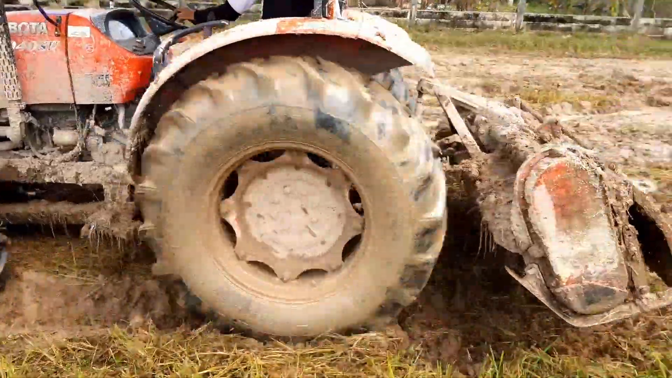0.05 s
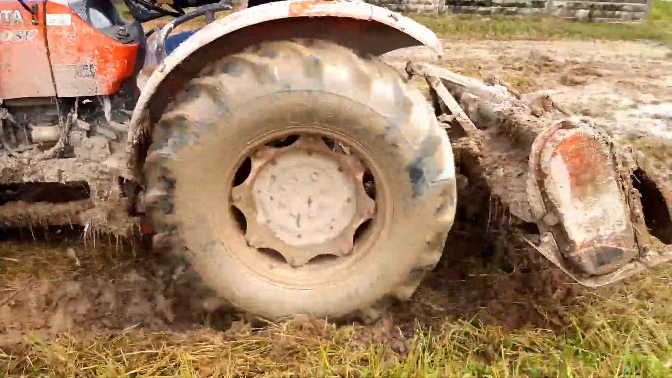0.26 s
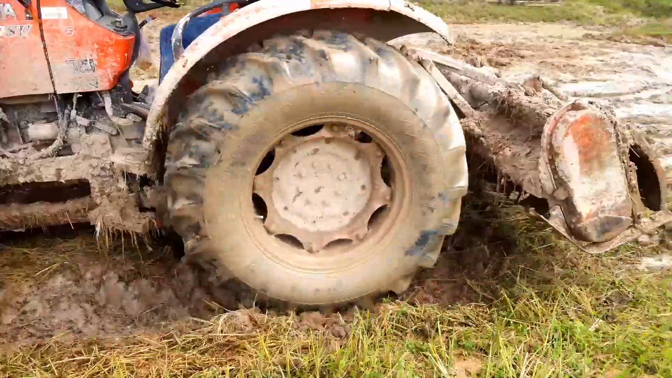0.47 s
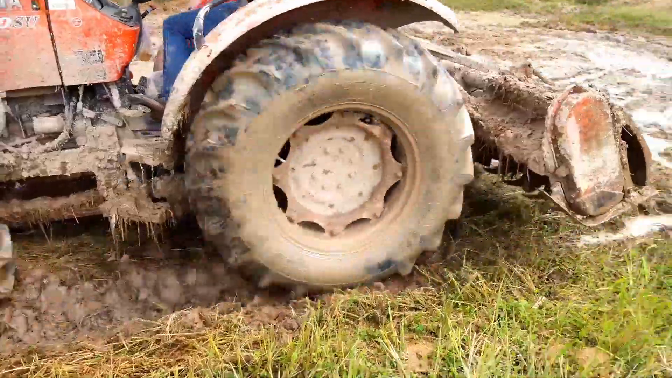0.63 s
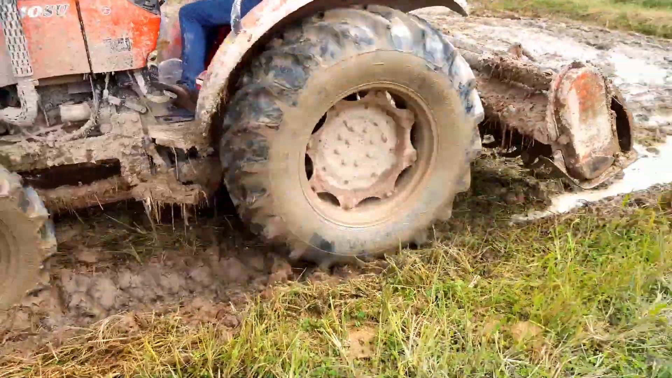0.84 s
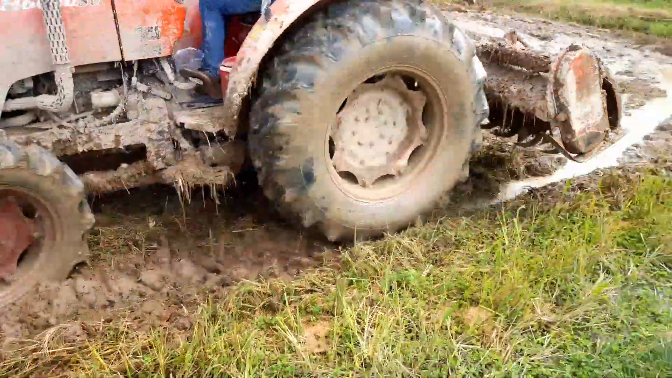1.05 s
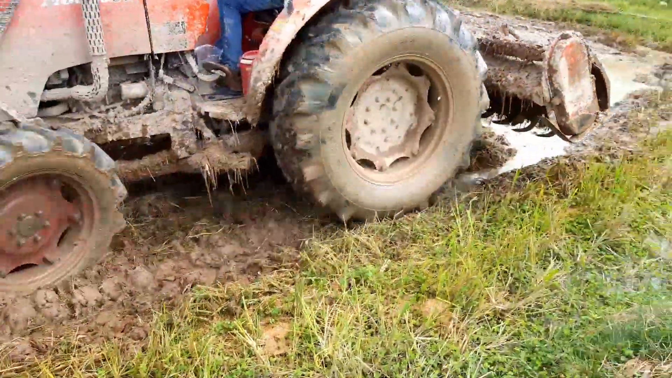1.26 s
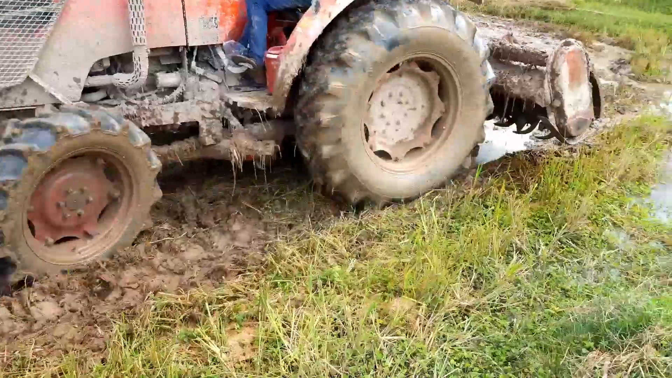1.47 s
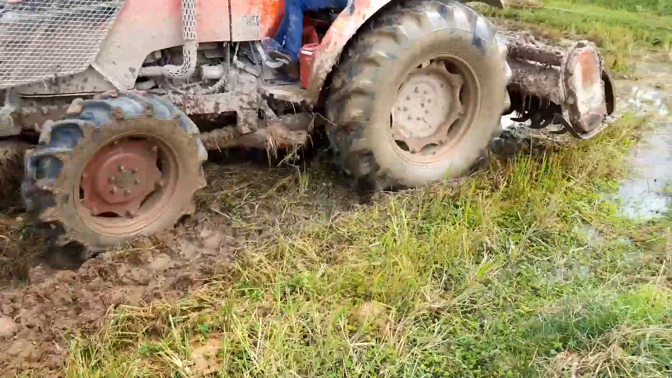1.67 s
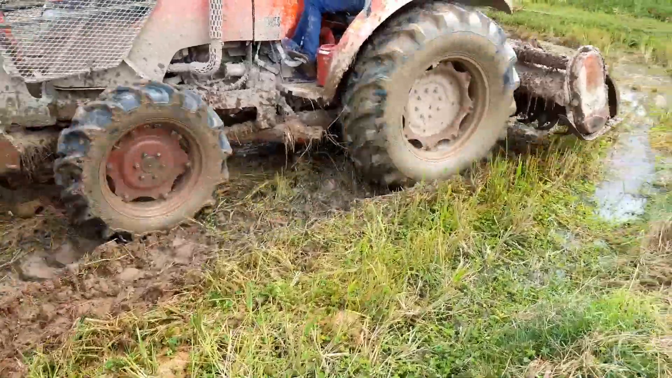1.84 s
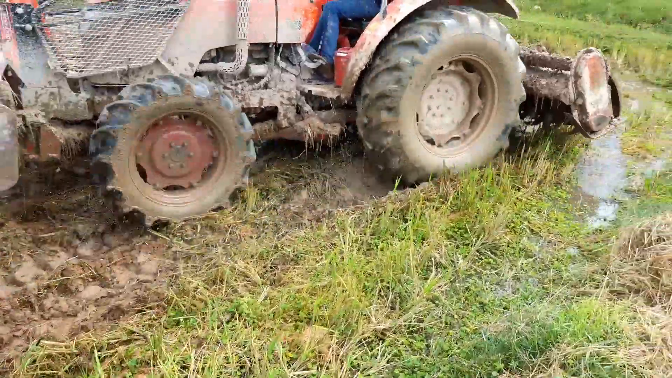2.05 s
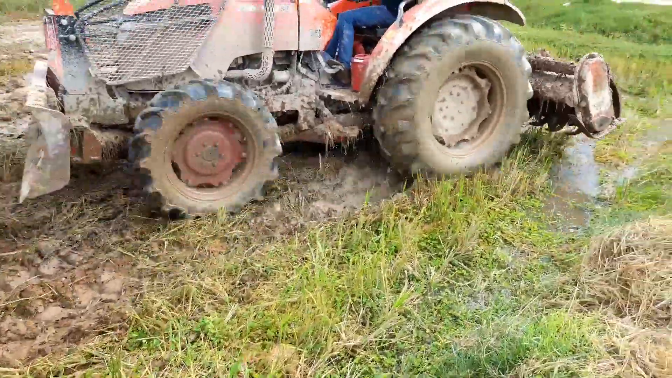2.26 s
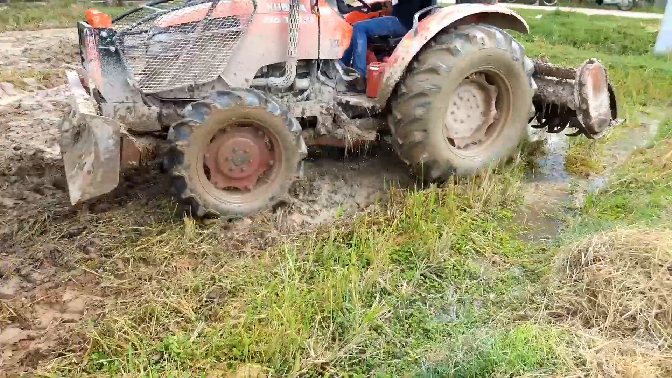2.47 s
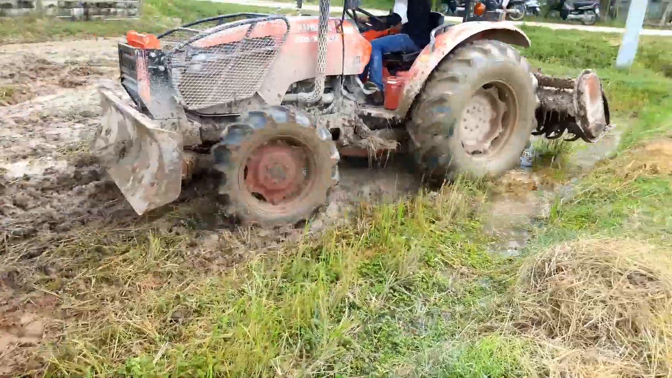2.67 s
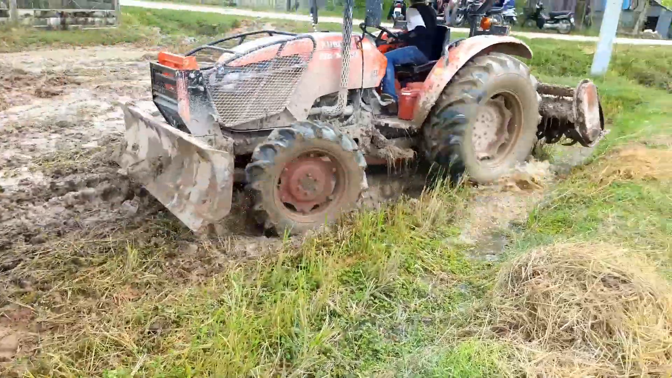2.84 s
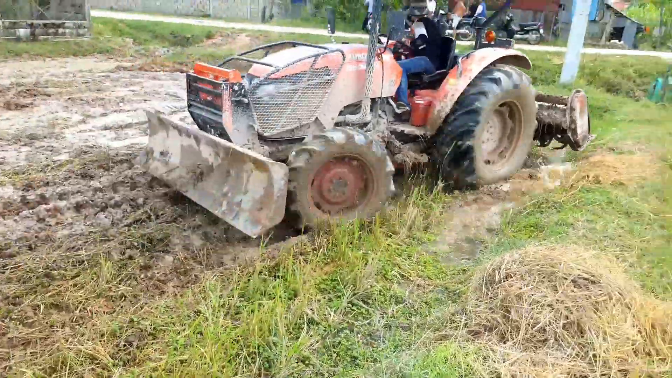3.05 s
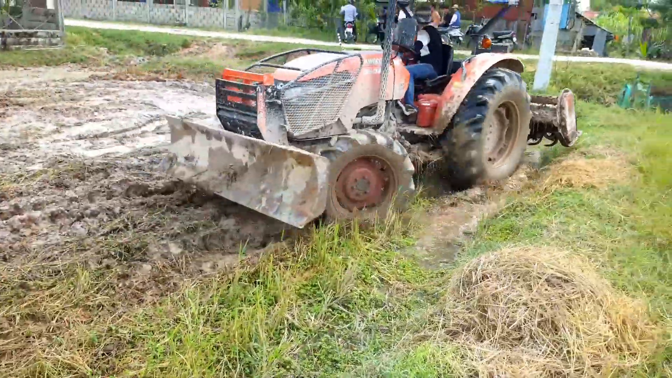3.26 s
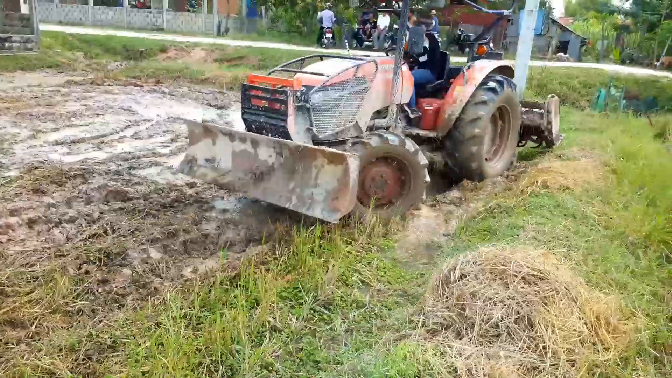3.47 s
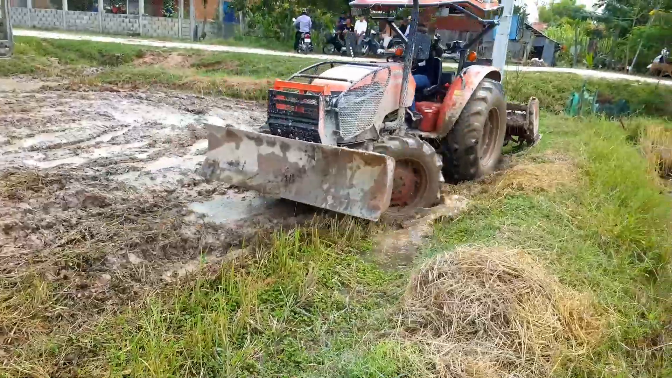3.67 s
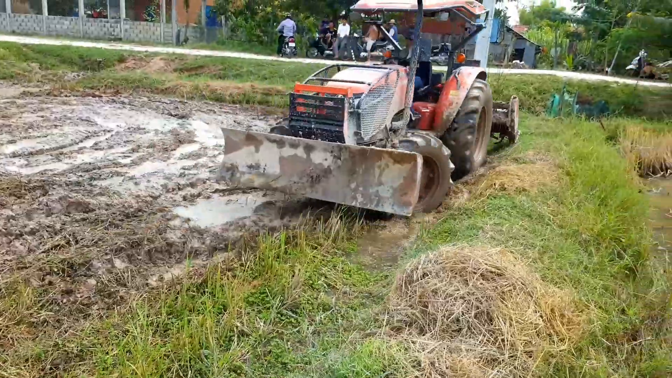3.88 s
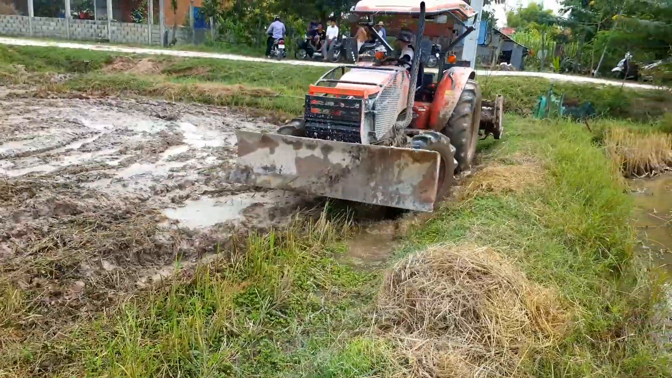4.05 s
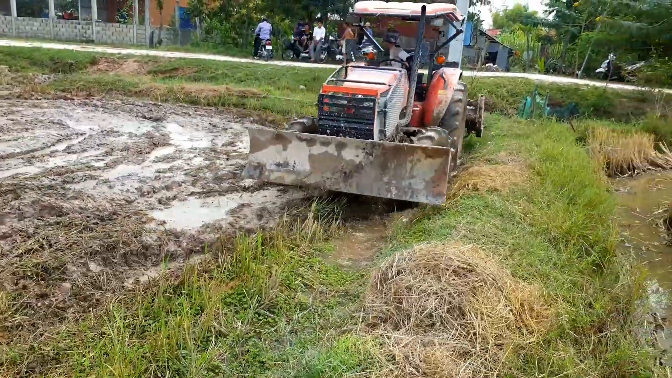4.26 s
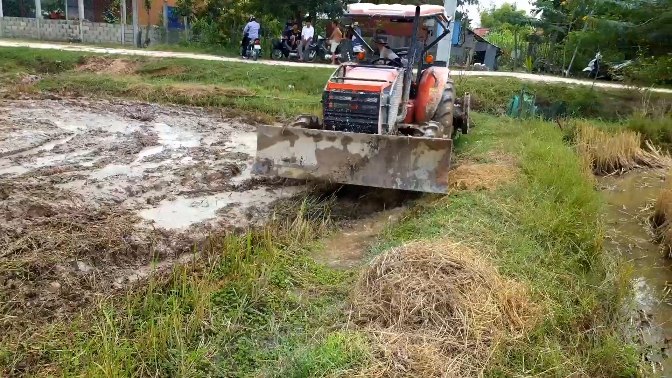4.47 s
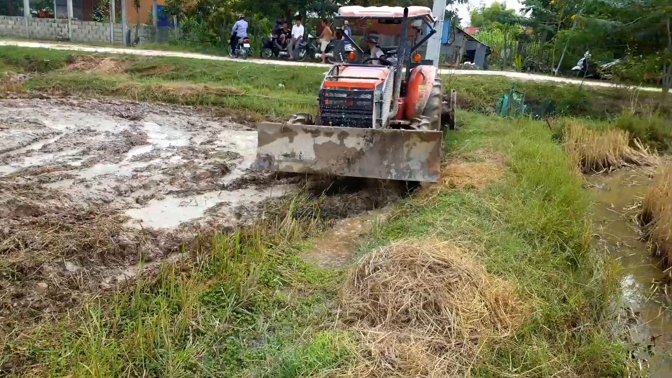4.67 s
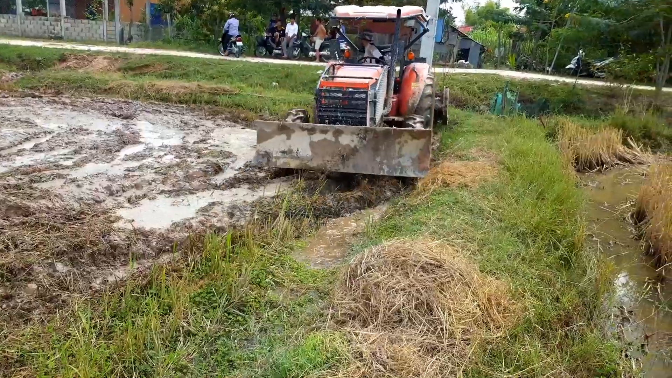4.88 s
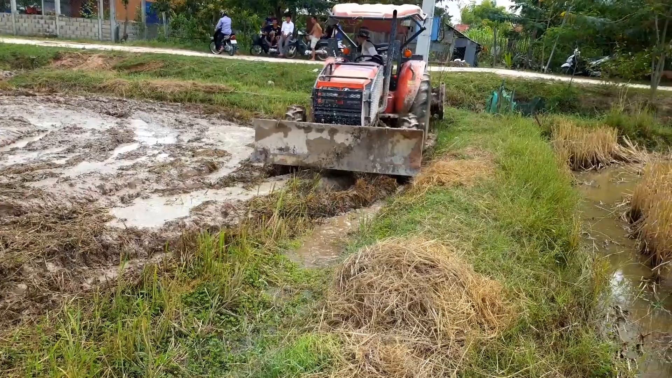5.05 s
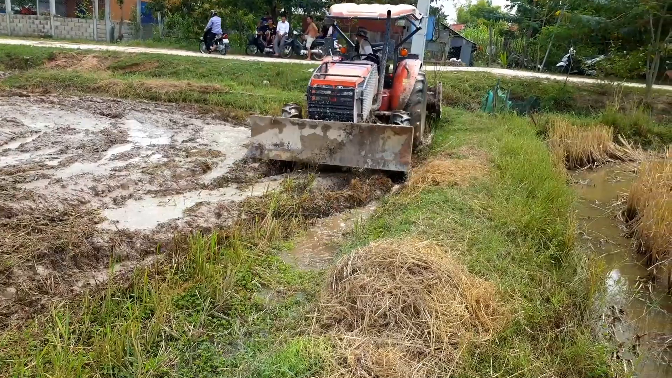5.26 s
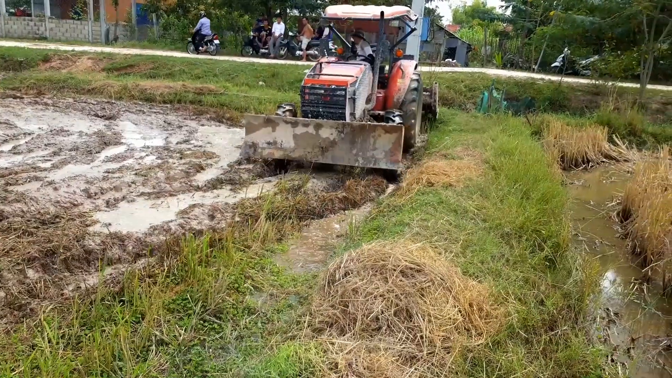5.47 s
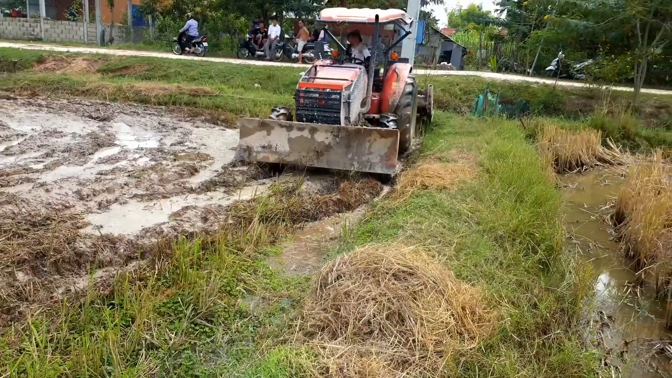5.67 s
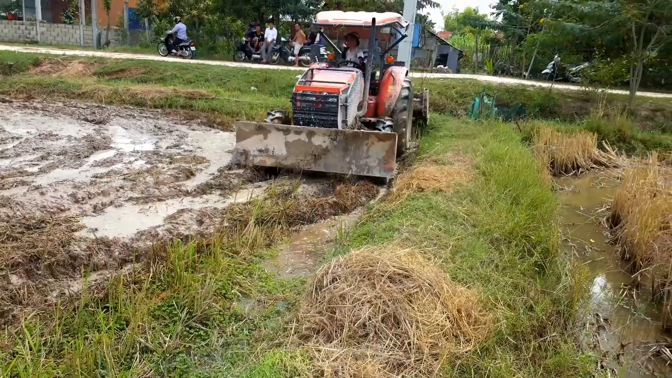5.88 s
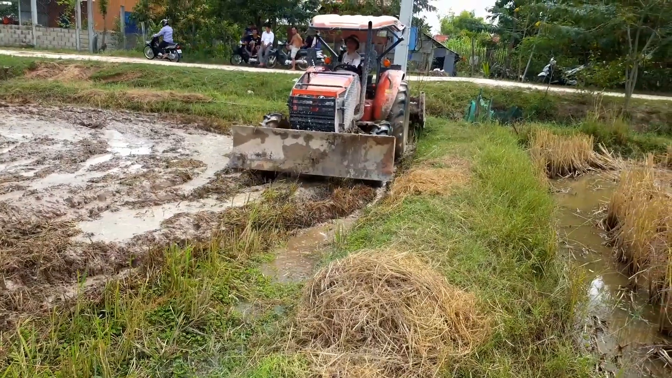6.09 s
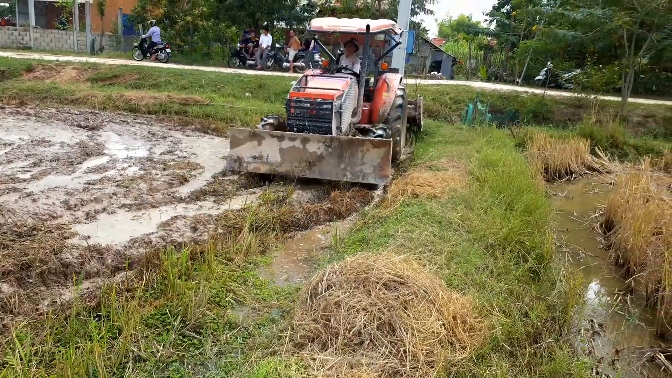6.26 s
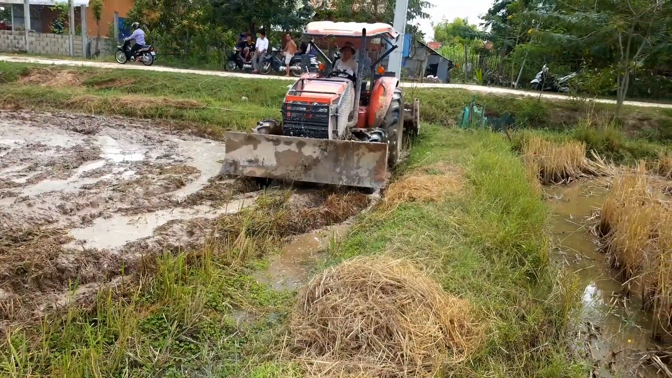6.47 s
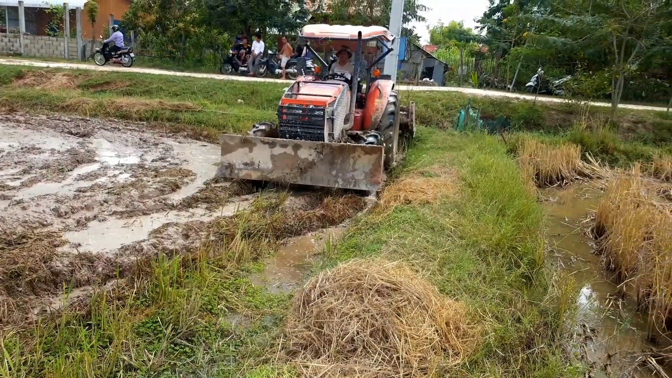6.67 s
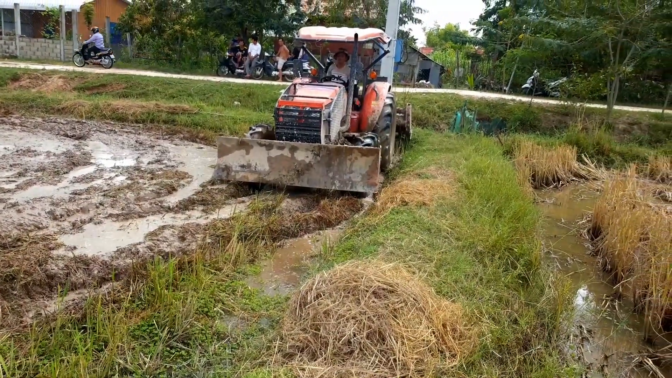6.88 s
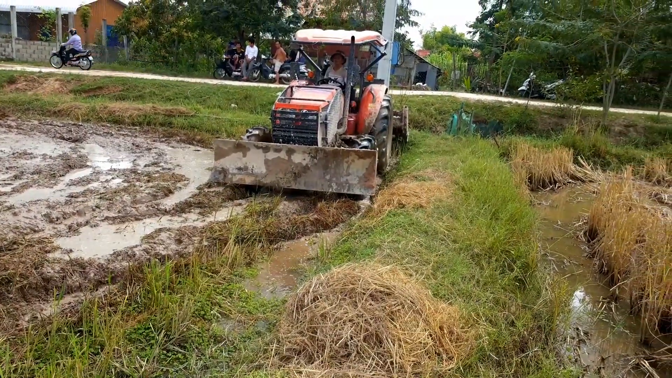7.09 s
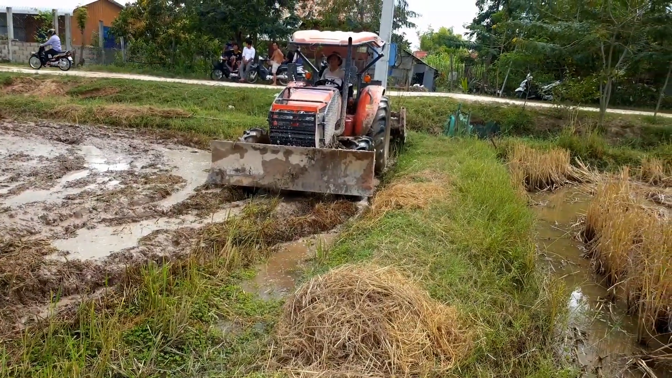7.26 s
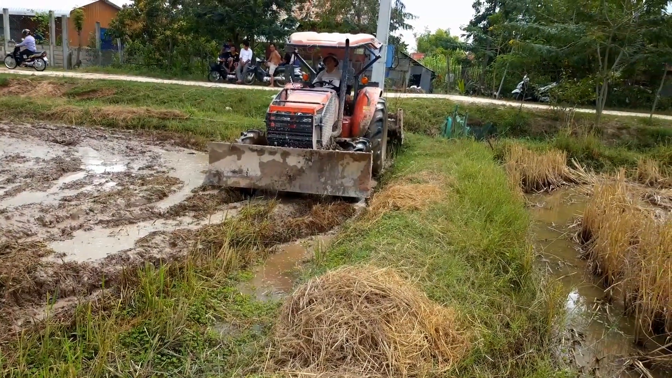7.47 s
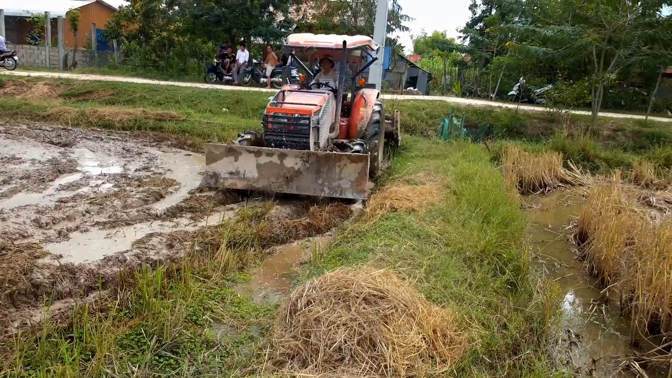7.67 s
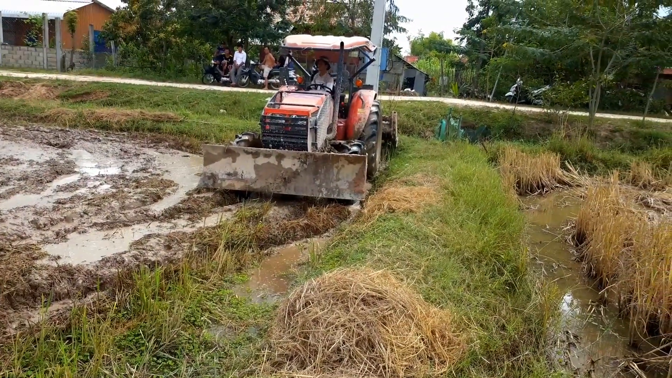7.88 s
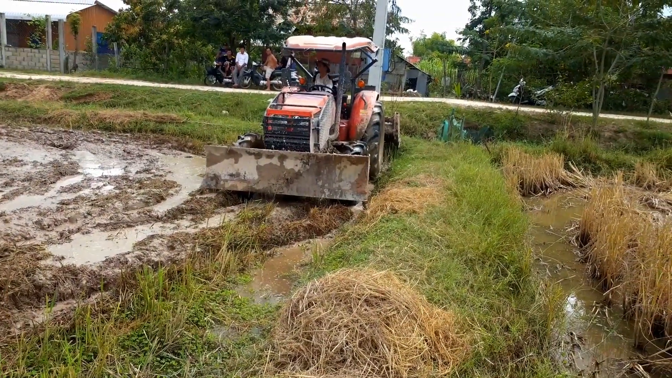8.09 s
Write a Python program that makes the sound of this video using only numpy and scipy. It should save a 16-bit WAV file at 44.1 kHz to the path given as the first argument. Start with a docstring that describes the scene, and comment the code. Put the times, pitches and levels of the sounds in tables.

```python
"""A four-cylinder diesel tractor drives past at full revs through a wet field, then throttles back and pulls up.
It goes from left of the stereo microphone to straight ahead, two to six metres off. The engine sinks almost
to a stall, catches with hard knocks, idles and revs up again. Exhaust, drone, clatter, knock and fan are tones
or pulsed noise that follow the crankshaft; body parts are resonances or coloured noise.
A loose steel part clanks four times, and a faint outdoor hush of noise lies behind it all."""
import sys
import numpy as np
from scipy import signal
from scipy.fft import rfft, irfft, next_fast_len
from scipy.io import wavfile
from scipy.ndimage import uniform_filter1d, map_coordinates

SR = 44100
rng = np.random.default_rng(int(sys.argv[2]) if len(sys.argv) > 2 else 0)


def store_pcm(level_fs):
    """Save levels as 16-bit WAV."""
    pcm = np.round(np.clip(level_fs, -1, 1) * 32767).astype(np.int16)
    wavfile.write(sys.argv[1], SR, np.atleast_2d(pcm).T)


N = 358533

# throttle moves: full revs, ease off, sink towards a stall, catch, idle, rev up:
# (time [s], speed aimed at [firings/s], settling time [s], load [0-1], time for the fuel to follow [s])
THROTTLE_MOVES = [(0, 91.3, .3, .14, .01), (3.11, 61.3, .28, .37, 1.3), (4.87, 3, 1.87, .1, .09),
                  (6.581, 53.8, .458, .33, .11), (6.86, 40.67, .1, .14, .08), (7.724, 70.2, .38, .17, .036)]
# changing drag of the mud at full revs: (time [s], speed gained [firings/s])
MUD_DRAG = [(.45, -.2), (1.15, -1.1), (1.8, 1.2), (2.52, 0), (2.87, 1.1), (3.15, 0)]
GOVERNOR_GAIN = 0.029  # extra fuel for each firing per second that the engine is short of its aim
CATCH_S = 6.725  # a firing falls here, as the engine catches
# path past the microphone: (time [s], distance [m],
# nearness [1 = beside the open engine bay, 0 = facing the bonnet], lag of the right ear [samples])
PATH = [(0, 2.64, 0.8, 9), (1.2, 2.19, 0.83, 10.5), (2.2, 3.04, 0.87, 4), (3, 3.12, 0.82, 0),
        (3.8, 3.8, 0.69, -1.5), (5, 5.74, 0.65, -2), (6, 3.86, 0.4, -4), (8.13, 4.97, 0.4, -0.5)]
MID_SPEED = 60  # firings per second at which the loudness laws start
# loudness laws, before the mix inside each part:
# (level at 1 m and MID_SPEED [dB], rise per doubling of speed [dB], added at full fuel [dB])
BOOM_LAW = (-30.5, 8.26, -2)
CLATTER_LAW = (-32, 12.54, 4)
KNOCK_LAW = (-51, 16.25, 20.9)

# exhaust note: (multiple of the firing rate, level [dB])
EXHAUST_ORDERS = [(1, 1.5), (1.5, -8), (2, -1), (3, -4), (4, -6), (5, -12)]
# resonances of the exhaust pipe: (frequency [Hz], gain [dB])
PIPE_RESPONSE = [(33, -11), (41, -1.5), (62, 0), (82, -3.5), (118, 1.5), (145, -1), (168, 1.5), (215, -11),
                 (300, -33)]
# exhaust note without fuelling: (time [s], level [dB])
EXHAUST_LEVEL = [(0, -43), (1.4, -66), (3.3, -45), (4.4, -42), (5.3, -45.5), (6.3, -48), (6.7, -55),
                 (6.85, -46.5), (7.7, -54), (8.13, -40.5)]
EXHAUST_FUEL_DB = 14  # added at full fuel
# deep throb that drifts against the racing engine: (time [s], rate [beats/s], level [dB])
THROB_COURSE = [(0, 39, -39), (.4, 42.8, -33), (.9, 45, -37), (1.4, 51.4, -37.5), (1.6, 45.3, -36.5),
                (2.08, 49, -32.5), (2.2, 44.3, -31), (2.36, 44, -30), (2.72, 40.3, -31), (2.85, 47.6, -37),
                (3.5, 61.7, -40), (4.3, 68, -74)]

# strong orders of the drone at full revs: (multiple of the four-stroke cycle, level [dB])
DRONE_ORDERS = [(7, -4), (8, -4), (12, -6), (15, -6), (20, -9), (24, -4)]
DRONE_REST_DB = -13.5  # the other multiples
# boom of the hood panels: (frequency [Hz], density [dB per Hz])
HOOD_SPECTRUM = [(25, -34), (50, -20.5), (90, -9.5), (130, -2.5), (175, -1), (225, -6), (290, -15.5),
                 (450, -22), (900, -78)]
# swell of the boom as the tractor passes: (time [s], gain [dB])
BOOM_SWELL = [(0, 0), (.55, 1.5), (1.5, -4.5), (2.1, -1), (7.6, -1.5), (7.8, -3)]
# brief booms of the hood just after each closing of the throttle: (time [s], level [dB])
OVERRUN_BOOMS = [(3.17, -31), (4.99, -36.5), (6.925, -37.5)]
OVERRUN_HZ, OVERRUN_WIDTH_S = 177, 0.044

# clatter beside the engine bay, and facing the bonnet: (frequency [Hz], density [dB per Hz])
CLATTER_NEAR = [(120, -50), (260, -10), (380, -7.5), (590, -3.5), (800, -5.5), (930, -9), (1200, -8.5),
                (1600, -10), (2400, -12.5), (3300, -21.5), (5000, -72)]
CLATTER_FAR = [(120, -4), (280, 9), (450, -8), (700, 8), (900, -2), (1100, 0), (1450, -0.5), (2000, -15),
               (2600, -42), (3300, -27), (5000, -65)]
# sizzle of the metal beside the engine bay, and facing the bonnet: (frequency [Hz], density [dB per Hz])
SIZZLE_NEAR = [(700, -1.5), (2000, -2), (3400, 4), (4400, 0.5), (5200, -2.5), (6500, -8), (9800, -3.5),
               (12000, -3), (15500, -14.5)]
SIZZLE_FAR = [(400, -5), (1000, 32.5), (2000, -6), (3100, 16), (4100, -4), (5500, 7), (7000, 3),
              (10500, -12), (13000, -45)]
# castings rung by hard ignitions: (frequency [Hz], width [Hz], level [dB])
CASTING_MODES = [(1170, 80, 11), (1380, 110, 3), (1950, 130, 2.5), (10450, 900, -11.5)]
# gas ringing in the cylinders: (frequency [Hz], width [Hz], level [dB])
CHAMBER_MODES = [(3600, 260, -1.5), (4060, 200, 0), (4700, 300, -10), (5250, 250, -13), (6280, 260, -8)]
# slow firings ring higher and harder: (speed [firings/s], pitch ratio, gain [dB])
CHAMBER_PITCH = [(33, 1.01, 2.5), (44, .915, .5)]
# dull body of each ignition near a stall: (frequency [Hz], density [dB per Hz])
THUD_SPECTRUM = [(150, -20), (330, 5.5), (520, 0), (1350, -3), (2000, -11), (4000, -46)]
THUD_DB, THUD_BELOW_SPEED = -47.5, 50.5  # level at full fuel; speed in firings per second

# block rung by combustion whenever the engine pulls: (frequency [Hz], width [Hz], level [dB])
BLOCK_MODES = [(1180, 90, 0), (1940, 130, -11), (2450, 80, -8), (3400, 300, -14)]
# its drift: (time [s], pitch ratio, level [dB])
BLOCK_COURSE = [(0, 1, -56), (1.5, 1.05, -37.5), (2, 1, -47.5), (2.65, 0.98, -38.5), (3.9, 0.85, -59.5),
                (4.85, 0.91, -47), (4.951, 0.91, -77), (7.73, 0.91, -77), (7.75, 0.98, -49.5)]
# hollow hum while the tractor swings round: (frequency [Hz], width [Hz], level [dB])
HUM_MODES = [(540, 60, 0)]
# its drift: (time [s], pitch ratio, level [dB])
HUM_COURSE = [(1.8, 0.98, -48), (3.151, 0.93, -38.5), (3.7, 1, -53.5), (4.85, 1, -52), (5, 1, -80)]
# bright rasp of the gas in the cylinders at part throttle: (time [s], pitch ratio, level [dB])
RASP_COURSE = [(2.9, 0.9, -62), (3.6, 0.837, -59), (4.85, 0.86, -63), (5, 0.92, -74)]
# whirr of the valve gear when the engine coasts: (frequency [Hz], width [Hz], level [dB])
WHIRR_MODES = [(725, 60, 1), (835, 45, -1), (2940, 130, 0), (5300, 260, -13), (10150, 200, -19)]
# its drift: (time [s], pitch ratio, level [dB])
WHIRR_COURSE = [(4.85, 0.93, -61), (5, 1, -52), (6.2, 1, -66), (8.13, 0.95, -63)]
CRANK_DB = -14.5  # each crankshaft order, relative to the clatter

# gear hum and fan whine: (multiple of the firing rate, level [dB])
WHINE_ORDERS = [(4.27, 7.5), (6.5, 4.5), (13, -.5), (19.5, -1), (23.1, -7)]
# the fan shroud sings when an order slides through its resonance
SHROUD_HZ, SHROUD_WIDTH_HZ, SHROUD_DB = 405.7, 6, 15
SQUEAK_HZ, SQUEAK_DB, SQUEAK_FROM_S, SQUEAK_TO_S = 8800, -70.5, 6.95, 7.72
# knocks of the loose steel part: (time [s], level [dB], time to fall by 60 dB [s])
CLANKS = [(4.08, -40, 0.074), (4.802, -48, .05), (7.379, -44, 0.3), (8.059, -37, .05)]
# colour of the loose steel: (frequency [Hz], density [dB per Hz])
STEEL_SPECTRUM = [(200, -5), (600, 14), (1400, 5), (2700, 1.5), (4000, -18), (15000, -28)]
# outdoor hush: (frequency [Hz], density [dB per Hz])
HUSH_SPECTRUM = [(30, 28), (200, 7), (1000, -18), (4000, -39), (9000, -38), (15000, -26)]
# likeness of the two channels: (frequency [Hz], likeness [0-1])
STEREO_LIKENESS = [(60, 0.7), (150, 0.88), (400, 0.77), (950, 0.8), (2400, 0.58), (6000, 0.09),
                   (15000, 0.1)]
# response of the microphone ports: (frequency [Hz], gain [dB])
MICROPHONE_PORTS = [(20, -28), (40, 0.5), (5500, -0.5), (6800, -4.5), (7850, -17), (8700, -6.5),
                    (9700, 4.5)]
TOP_HZ = 15550  # band limit of the microphone


def amp(db):
    """Decibels to gain."""
    return 10 ** (np.asarray(db) / 20)


def unit(x):
    """Scale to rms 1."""
    return x / np.sqrt(np.mean(x ** 2) + 1e-20)


def noise():
    """Two unrelated channels of white noise."""
    return rng.standard_normal((2, N))


def along(points, hz):
    """Read (frequency, value) points on a log frequency axis."""
    f, v = np.transpose(points)
    return np.interp(np.log(hz + 1), np.log(f + 1), v)


def curves(rows):
    """One value per sample for each column after the time."""
    s, *columns = np.transpose(rows)
    return [np.interp(np.arange(N) / SR, s, column) for column in columns]


def wobble(rate):
    """A smooth random curve with rate knots a second."""
    coarse_n = np.arange(0, N, 100)
    coarse = map_coordinates(rng.standard_normal(400), [coarse_n * rate / SR], mode="wrap")
    return np.interp(np.arange(N), coarse_n, coarse)


def filtered(x, response):
    """Multiply the spectrum of x by a response of frequency."""
    size = next_fast_len(N + 8192, True)
    hz = np.fft.rfftfreq(size, 1 / SR)
    return irfft(rfft(x, size) * response(hz), size)[..., :N]


def spread(pair, response):
    """Two unrelated signals become a coloured stereo pair of rms 1, most alike in the lower bands."""
    def gains(hz):
        turn = np.arccos(np.clip(along(STEREO_LIKENESS, hz), -1, 1)) / 2
        return response(hz) * np.array([np.cos(turn), np.sin(turn)])
    mid, side = filtered(pair, gains)
    return unit(np.array([mid + side, mid - side]))


def coloured(pair, spectrum):
    """Stereo sound of rms 1 shaped by the given spectrum."""
    return spread(pair, lambda hz: amp(along(spectrum, hz)))


def blend(a, b, share):
    """Mix unrelated signals; share is b's part of the power."""
    share = np.clip(share, 0, 1)
    return np.sqrt(1 - share) * a + np.sqrt(share) * b


def facing(pair, near, near_spectrum, far_spectrum):
    """The colour changes as the engine bay turns away from the microphone."""
    near = np.clip(near, 0, 1)
    return near * coloured(pair, near_spectrum) + (1 - near) * coloured(pair, far_spectrum)


def patchy(x, depth_db):
    """The colour flickers: narrow bands swell and fade at random."""
    bands = signal.stft(x, nperseg=2048)[2]
    field = rng.standard_normal(bands.shape[1:])
    for _ in range(2):
        field = uniform_filter1d(field, size=4, axis=0)  # across frequency
        field = uniform_filter1d(field, size=7, axis=1)  # across time
    flickering = signal.istft(bands * amp(depth_db * unit(field)), nperseg=2048)[1]
    return unit(flickering[:, :N])


def tones(turns, orders, waver_db, rate, gain=lambda multiple: 1):
    """Sines locked to a shaft, each wavering in strength."""
    total = 0
    for multiple, db in orders:
        strength = amp(db + waver_db * wobble(rate)) * gain(multiple)
        total = total + strength * np.sin(2 * np.pi * (multiple * turns + rng.random()))
    return total


def impacts(firings, speed, jitter_s, scatter_db, count):
    """Parts strike near the same crank angles in every cycle of four firings, with slight jitter."""
    angle = 4 * (np.arange(count) + rng.random(count)) / count
    cycles = np.arange(np.floor(firings[0] / 4), firings[-1] / 4)
    when = np.interp(4 * cycles[:, None] + angle, firings, np.arange(N), left=-SR, right=-SR)
    when = np.round(when + jitter_s * SR * rng.standard_normal(when.shape)).astype(int)
    sign = rng.choice([-1, 1], (2, 1, count))
    size = sign * amp(scatter_db * rng.standard_normal((2, *when.shape)))
    heard = (when >= 0) & (when < N)
    strikes = np.array([np.bincount(when[heard], s[heard], N) for s in size])
    return unit(strikes / np.sqrt(speed))  # steady power at any speed


def bursts(firings, speed, lead_s, decay_s, scatter_db):
    """Envelope of mean power 1 that jumps at each firing and dies away."""
    stroke = firings + lead_s * speed
    index = np.floor(stroke - np.floor(stroke[0])).astype(int)
    size = amp(scatter_db * rng.standard_normal(1000))[index]
    power = decay_s * speed / 2 * (1 - np.exp(-2 / (decay_s * speed)))
    since_firing_s = (stroke % 1) / speed
    return unit(size * np.exp(-since_firing_s / decay_s) / np.sqrt(power))


def ringing(modes, hz):
    """Response of resonances (frequency, width, level) with alternating sign."""
    total = 0
    for k, (center, width, db) in enumerate(modes):
        damping = 1j * hz * width
        total = total + (-1) ** k * amp(db) * damping / (center * center - hz * hz + damping)
    return total


def rung(drive, modes, ratio):
    """Stereo resonances of rms 1, rung by the drive; their pitch follows the ratio."""
    turns = np.cumsum(ratio) / SR
    total = 0
    for hz, width, db in modes:
        carrier = np.exp(2j * np.pi * hz * turns)
        pole = np.exp(-2 * np.pi * width * .75 / SR)  # two such poles give about the stated width
        swing = signal.lfilter([1], np.poly([pole, pole]), drive / carrier)
        total = total + amp(db) * unit((swing * carrier).real)
    return spread(total, np.ones_like)


def drifting(drive, modes, course):
    """Resonances whose pitch and level follow a course."""
    ratio, level_db = curves(course)
    return amp(level_db) * rung(drive, modes, ratio)


def governor():
    """Speed settles towards each throttle setting; fuel (the bite of combustion) follows load and missing speed."""
    t = np.arange(N) / SR
    _, first_speed, _, first_load, _ = THROTTLE_MOVES[0]
    speed, bite = np.full(N, float(first_speed)), np.full(N, float(first_load))
    for s, aim, settle_s, load, fuel_s in THROTTLE_MOVES:
        since = np.maximum(t - s, 0)
        settling = aim + (np.interp(s, t, speed) - aim) * np.exp(-since / settle_s)
        speed = np.where(t < s, speed, settling)
        demand = np.clip(load + GOVERNOR_GAIN * np.maximum(aim - speed, 0), 0, 1)
        bite = bite + (demand - bite) * np.clip(since / fuel_s, 0, 1)
    return speed + curves(MUD_DRAG)[0], bite


def injected(bite, firings, speed, lead_s):
    """Fuel is metered once a stroke, so the bite holds from one firing to the next."""
    stroke = np.floor(firings + lead_s * speed)
    return bite[np.searchsorted(stroke, stroke)]


def loudness(law, speed, bite, distance):
    """Level in dB of an engine part: changed by speed and fuel, down with distance."""
    base_db, doubling_db, fuel_db = law
    engine_db = base_db + doubling_db * np.log2(speed / MID_SPEED) + fuel_db * bite ** 2
    return engine_db - 20 * np.log10(distance)


def exhaust(firings, speed, exhaust_db):
    """The lowest firing orders slide through the fixed resonances of the pipe."""
    pipe = lambda k: amp(along(PIPE_RESPONSE, k * speed))
    return amp(exhaust_db) * tones(firings, EXHAUST_ORDERS, waver_db=3.0, rate=6.4, gain=pipe)


def throb():
    """A second low pulsation, uneven from beat to beat, drifts against the drone, then fades out."""
    rate, level_db = curves(THROB_COURSE)
    orders = [(1, -9.0), (2, -8), (3, 1.0), (4, 2.0), (5, -3)]  # (multiple of the beat, dB)
    turns = np.cumsum(rate) / SR + .018 * wobble(40)
    uneven_db = 2.9 * wobble(45)
    panels = lambda k: amp(along(HOOD_SPECTRUM, k * rate))
    return amp(level_db + uneven_db) * tones(turns, orders, waver_db=2, rate=6, gain=panels)


def hood(firings, speed, boom_db):
    """Panels boom with each stroke; at full revs they drone on multiples of the cycle."""
    thumps = impacts(firings, speed, jitter_s=0.00031, scatter_db=3.0, count=16)
    puffs = bursts(firings, speed, lead_s=0.0011, decay_s=0.02, scatter_db=1.5) * noise()
    boom = coloured(blend(thumps, puffs, 0.65), HOOD_SPECTRUM)
    strong = dict(DRONE_ORDERS)
    orders = [(k, strong.get(k, DRONE_REST_DB)) for k in range(5, 28)]
    drone = unit(tones(firings / 4, orders, waver_db=2.5, rate=3.5))
    racing = np.clip((speed - 80) / 10, 0, 1)
    return amp(boom_db) * (amp(1.0) * boom + amp(-1.8) * racing * drone)


def overrun():
    """The hood booms on its main resonance when the throttle closes."""
    t = np.arange(N) / SR
    swell = sum(amp(db) * np.exp(-((t - s) / OVERRUN_WIDTH_S) ** 2) for s, db in OVERRUN_BOOMS)
    return swell * np.sin(2 * np.pi * (OVERRUN_HZ * t + rng.random()))


def clatter(firings, speed, near, bite, clatter_db):
    """Valve gear rattles through the castings, over the roar of combustion."""
    taps = impacts(firings, speed, jitter_s=.00006, scatter_db=2, count=56)
    pulsing = bursts(firings, speed, lead_s=.002, decay_s=.009, scatter_db=1.5)
    pulse_depth = .1 + .55 * bite
    roar = noise() * np.sqrt(1 + pulse_depth * (pulsing ** 2 - 1))
    drive = patchy(blend(taps, roar, 0.55 + 0.36 * bite), depth_db=1.9)
    left_lean = amp(near * np.array([[2.1], [-2.1]]))  # louder on the left when near
    rattle = facing(drive, near, CLATTER_NEAR, CLATTER_FAR) * left_lean
    return amp(clatter_db + 0.37 * wobble(14)) * rattle


def knock(firings, speed, near, bite, knock_db):
    """More fuel makes ignitions ring the castings and cylinder gas; with less, the metal mostly sizzles."""
    blows = noise() * bursts(firings, speed, lead_s=.002, decay_s=.008, scatter_db=1.5)
    cracks = spread(blows, lambda hz: ringing(CASTING_MODES, hz))
    speeds, ratios, hard_db = np.transpose(CHAMBER_PITCH)
    ping = rung(blows, CHAMBER_MODES, np.interp(speed, speeds, ratios))
    hard = amp(np.interp(speed, speeds, hard_db))
    sizzle = facing(patchy(noise(), depth_db=2), near, SIZZLE_NEAR, SIZZLE_FAR)
    hard_knocks = hard * (amp(3.0) * cracks + amp(2.0) * ping)
    return amp(knock_db) * blend(amp(9.5) * sizzle, hard_knocks, bite)


def thuds(firings, speed, bite):
    """Slow, heavily fuelled firings land as dull separate blows."""
    blows = noise() * bursts(firings, speed, lead_s=.002, decay_s=.011, scatter_db=1)
    labouring = bite * np.clip((THUD_BELOW_SPEED - speed) / 10, 0, 1)
    return amp(THUD_DB) * labouring ** 2 * coloured(blows, THUD_SPECTRUM)


def resonances(firings, speed):
    """Firings and tappets keep the engine's metal and cylinder gas ringing."""
    strokes = noise() * bursts(firings, speed, lead_s=.002, decay_s=.013, scatter_db=1)
    taps = impacts(firings, speed, jitter_s=.0003, scatter_db=2, count=24)
    tappets = blend(taps, noise(), .6)
    block = drifting(strokes, BLOCK_MODES, BLOCK_COURSE)
    hum = drifting(strokes, HUM_MODES, HUM_COURSE)
    rasp = drifting(strokes, CHAMBER_MODES, RASP_COURSE)
    whirr = drifting(tappets, WHIRR_MODES, WHIRR_COURSE)
    return block + hum + rasp + whirr


def crank(firings, speed, clatter_db):
    """Above idle the block hums on a comb of crankshaft orders."""
    orders = [(k, CRANK_DB) for k in range(14, 35)]
    castings = lambda k: amp(along(CLATTER_NEAR, k * speed / 2))
    comb = tones(firings / 2, orders, waver_db=2.5, rate=4, gain=castings)  # two firings a turn
    return amp(clatter_db) * np.clip((speed - 45) / 10, 0, 1) * comb


def whine(firings, speed, lag, clatter_db):
    """Gears and fan sing at high revs, strongest while the tractor is well to the left."""
    leftward = np.clip(lag / 11, 0, 1)
    turns = firings + 0.0021 * wobble(14)  # the belt slips a little, so the whine wavers in pitch
    strength = np.clip((speed - 48) / 14, 0, 1) * (0.31 + 0.43 * leftward)
    shroud = lambda k: amp(SHROUD_DB * np.exp(-((k * speed - SHROUD_HZ) / SHROUD_WIDTH_HZ) ** 2))
    song = tones(turns, WHINE_ORDERS, waver_db=-1.0, rate=2.7, gain=shroud)
    return amp(clatter_db - 13.5) * strength * song


def squeak(firings):
    """At idle a belt squeaks faintly once per turn of the crankshaft."""
    t = np.arange(N) / SR
    rub = np.abs(np.sin(np.pi * firings / 2)) * (t > SQUEAK_FROM_S) * (t < SQUEAK_TO_S)
    turns = np.cumsum(SQUEAK_HZ + 50 * wobble(90)) / SR
    return amp(SQUEAK_DB) * rub * np.sin(2 * np.pi * turns)


def clanks():
    """A loose steel part knocks and rattles: coloured noise that dies away after each blow."""
    t = np.arange(N) / SR
    envelope = sum(amp(db - 60 * np.abs(t - s) / t60) * (t >= s) for s, db, t60 in CLANKS)
    return envelope * coloured(noise(), STEEL_SPECTRUM)


def hush():
    """The faint outdoor background is steady noise, strongest in the bass."""
    return amp(-49.0) * coloured(noise(), HUSH_SPECTRUM)


def placed(pair, lag):
    """Sound from the left reaches the right ear later; half the lag is given to each channel."""
    left, right = pair
    n = np.arange(N)
    return np.array([map_coordinates(left, [n + lag / 2]), map_coordinates(right, [n - lag / 2])])


def scene():
    """The tractor moves from the left to straight ahead over a faint outdoor hush."""
    speed, bite = governor()
    firings = np.cumsum(speed) / SR
    firings = firings - firings[round(CATCH_S * SR)]  # one cylinder fires just as the engine catches
    bite = injected(bite, firings, speed, lead_s=.002)
    smooth_bite = uniform_filter1d(bite, size=220)
    distance, near, lag = curves(PATH)

    exhaust_db = curves(EXHAUST_LEVEL)[0] + EXHAUST_FUEL_DB * smooth_bite ** 2
    boom_db = loudness(BOOM_LAW, speed, smooth_bite, distance) + curves(BOOM_SWELL)[0]
    clatter_db = loudness(CLATTER_LAW, speed, bite, distance)
    knock_db = loudness(KNOCK_LAW, speed, bite, distance)

    lows = exhaust(firings, speed, exhaust_db) + throb() + hood(firings, speed, boom_db) + overrun()
    highs = clatter(firings, speed, near, bite, clatter_db) + knock(firings, speed, near, bite, knock_db)
    blows = thuds(firings, speed, bite)
    singing = resonances(firings, speed) + crank(firings, speed, clatter_db) + squeak(firings)
    tractor = placed(lows + highs + blows + singing, lag)
    return tractor + whine(firings, speed, lag, clatter_db) + clanks() + hush()


def record(dry):
    """The microphone ports cut a notch in the treble; nothing is kept above the band limit."""
    return filtered(dry, lambda hz: amp(along(MICROPHONE_PORTS, hz)) * (hz < TOP_HZ))


dry = scene()
out = record(dry)
store_pcm(out)
```